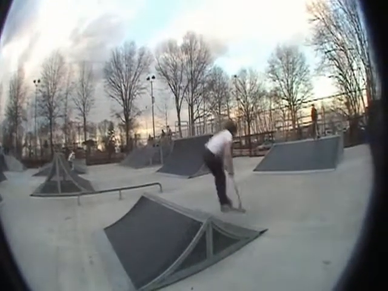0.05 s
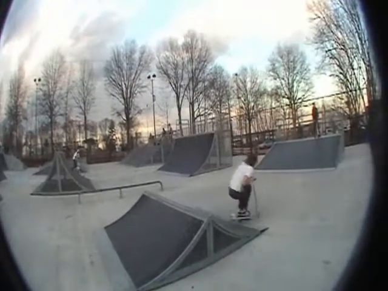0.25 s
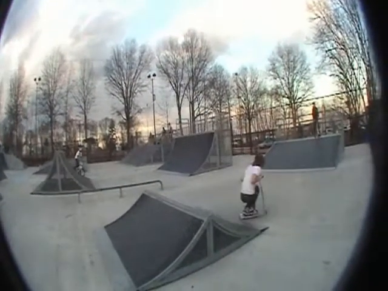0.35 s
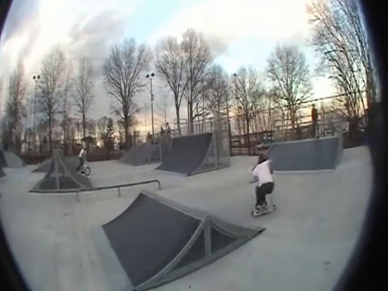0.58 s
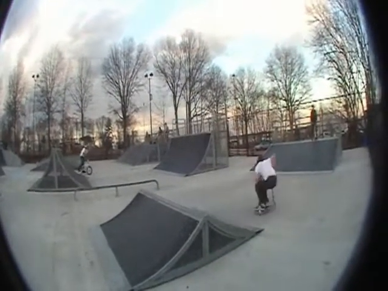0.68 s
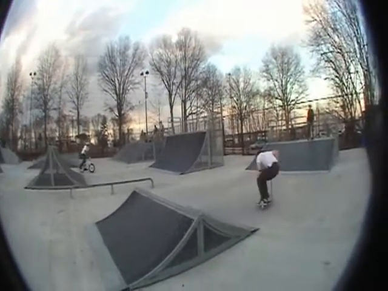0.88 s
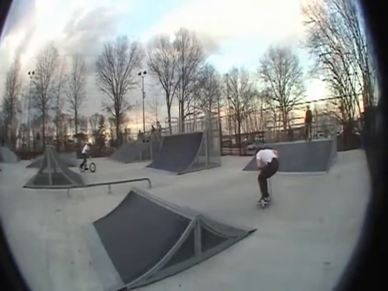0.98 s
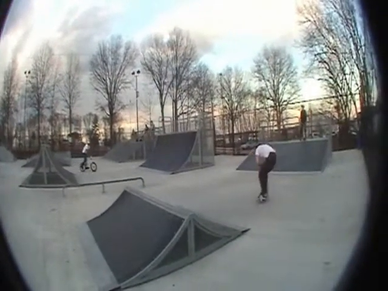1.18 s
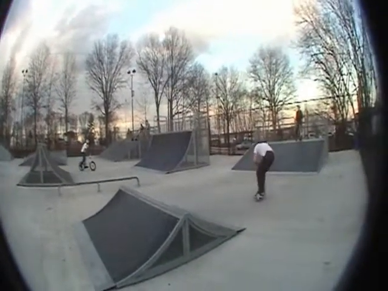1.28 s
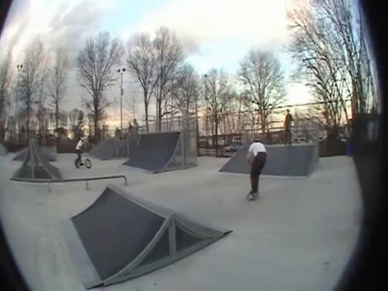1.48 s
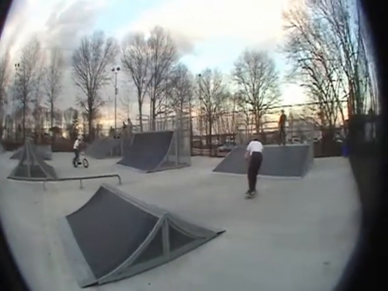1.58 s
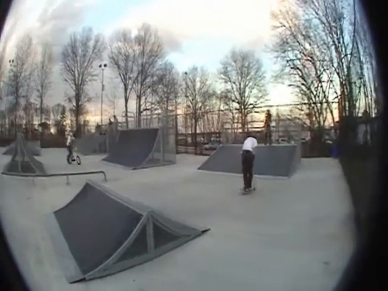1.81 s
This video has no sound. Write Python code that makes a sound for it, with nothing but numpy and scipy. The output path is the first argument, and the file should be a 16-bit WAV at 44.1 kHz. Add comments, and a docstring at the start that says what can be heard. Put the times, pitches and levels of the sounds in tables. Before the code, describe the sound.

A stunt scooter lands close on the right with a hard, ringing clatter at an outdoor skatepark. A lighter clatter and clinks follow, then the wheels rumble softly over concrete joints and scrub briefly, with light wind on the microphone.

```python
"""An outdoor concrete skatepark: a stunt scooter lands hard, close by on the right, and rolls away.
Wheels and deck (the board you stand on) slam down in a quick clatter that rings on in the frame and
among the ramps; a lighter clatter follows. Loose parts clink. The wheels rumble, tick, thud over
joints and scrub sideways in a turn, while a light wind brushes the microphone."""
import sys
import numpy as np
from scipy import signal
from scipy.fft import rfft, irfft
from scipy.io import wavfile

SR = 44100
rng = np.random.default_rng(int(sys.argv[2]) if len(sys.argv) > 2 else 0)


def to_wav(s):
    """Save 16-bit WAV."""
    ch = np.atleast_2d(s).T  # columns
    pcm = np.round(np.clip(ch, -1, 1) * 32767)  # PCM
    wavfile.write(sys.argv[1], SR, pcm.astype(np.int16))


N = 81585


def amp(db):
    """Turns decibels into a number to multiply a sound by."""
    return 10 ** (np.asarray(db) / 20)

def unit(x):
    """Scales a signal to an average power of 1."""
    return x / np.sqrt(np.mean(x ** 2) + 1e-20)

def look_up(table, hz):
    """Reads a table between its rows, on a scale where all octaves are equally wide."""
    pitches, values = np.transpose(table)
    return np.interp(np.log(hz + 1), np.log(pitches + 1), values)

def loudness(table, column):
    """Turns one decibel column of a time table into a volume curve for the whole scene."""
    rows = np.array(table)
    return amp(np.interp(np.arange(N) / SR, rows[:, 0], rows[:, column]))

def add(mix, start_s, sound):
    """Mixes a sound in at its start time."""
    part = mix[:, max(round(start_s * SR), 0):][:, :sound.shape[-1]]
    part += sound[..., :part.shape[-1]]

TREBLE_HZ, BASS_HZ = 3640, 356
def colour(x, tone, treble_db=0, bass_db=0):
    """Sets how strong the pitches are next to each other, then turns treble and bass up or down."""
    size = 4096
    hz = abs(np.fft.fftfreq(size, 1 / SR))
    treble = treble_db * hz ** 2 / (hz ** 2 + TREBLE_HZ ** 2)
    bass = bass_db * BASS_HZ ** 2 / (hz ** 2 + BASS_HZ ** 2)
    gain = unit(amp(look_up(tone, hz))) * amp(treble + bass)
    response = np.exp(np.conj(signal.hilbert(np.log(gain + 1e-6))))  # nothing sounds before its hit
    taps = np.fft.ifft(response).real[:size // 2]
    return signal.fftconvolve(x, taps[None], axes=1)[:, :x.shape[1]]

# How alike left and right sound: pitch_hz, likeness (0 to 1)
LIKENESS = [(50, .985), (200, .995), (650, .975), (1400, .86), (3000, .82), (7000, .62), (11000, .38),
            (16000, .28)]
def stereo(a, b):
    """Blends two signals so that left and right share the bass but differ in the treble."""
    same = look_up(LIKENESS, np.fft.rfftfreq(len(a), 1 / SR))
    left = irfft(same * rfft(a) + np.sqrt(1 - same ** 2) * rfft(b), len(a))
    return np.array([left, a])

def noise(n):
    """An even hiss in stereo, n samples long."""
    return stereo(*rng.standard_normal((2, n)))

def clicks(n, per_s, spread_db):
    """Scattered clicks of uneven size, in stereo."""
    size = amp(spread_db * np.minimum(rng.exponential(1, (2, n)), 4)) * rng.choice([-1, 1], (2, n))
    happens = rng.random((2, n)) < per_s / SR
    return unit(stereo(*(size * happens)))

def ringing(notes, t):
    """Struck metal rings with several pure notes; each drops 60 dB in its ring_s."""
    return np.sqrt(2) * sum(amp(db - 60 * t / ring_s) * np.sin(2 * np.pi * (hz * t + rng.random()))
                            for hz, db, ring_s in notes)

# How loud the rolling is: time_s, rumble_db, hiss_db
ROLL_LEVELS = [(0, -46, -32), (0.03, -41.5, -42), (0.19, -39.5, -45.5), (0.45, -29, -31.5),
               (0.56, -36, -35), (0.67, -40, -35), (0.71, -41, -50.5), (0.80, -37.5, -50),
               (1.05, -38.5, -55.5), (1.28, -42, -52), (1.36, -37, -43.5), (1.40, -34, -45),
               (1.50, -34.5, -44.5), (1.565, -33, -43), (1.635, -37.5, -42.5), (1.70, -36, -46.5),
               (1.85, -35.5, -45)]
# Tone of the low rumble and of the gritty hiss: pitch_hz, level_db
RUMBLE_TONE = [(30, -27), (80, -7), (130, -2), (210, 1), (290, -5), (380, -2.5), (520, -12.5), (680, -9.5),
               (1000, -16), (1350, -17.5), (2000, -23), (4000, -58), (16000, -54)]
HISS_TONE = [(100, -16), (600, -3.5), (1350, -1.5), (2100, -1.5), (3000, -0.5), (4400, -8), (7000, -11),
             (10000, -24.5), (16000, -26.5)]
def rolling():
    """Hard wheels rumble and crush grit, unevenly, as the ground changes."""
    wobbles_per_s, grit_share = 35.2, 0.41
    wobble_times = np.arange(0, 2, 1 / wobbles_per_s)
    wobble_db = np.interp(np.arange(N) / SR, wobble_times, rng.standard_normal(N)[:len(wobble_times)])
    grit = np.sqrt(grit_share) * clicks(N, per_s=900, spread_db=2.5)
    hiss = colour(grit + np.sqrt(1 - grit_share) * noise(N), HISS_TONE)
    rumble = colour(noise(N), RUMBLE_TONE)
    return amp(wobble_db) * (rumble * loudness(ROLL_LEVELS, 1) + hiss * loudness(ROLL_LEVELS, 2))

# Tone of a wheel's thin tick: pitch_hz, level_db
TICK_TONE = [(500, -28), (3000, -17), (7000, 7), (8500, -1), (10800, 1), (12500, -21), (16000, -12)]
def wheel_ticks():
    """A spinning wheel ticks faintly once every turn."""
    turns_per_s, fade_s = 32, 0.0024
    turn, part_turn = np.divmod(np.arange(N) / SR * turns_per_s, 1)
    size = amp(-51.5 - 0.2 * rng.standard_normal(N))[turn.astype(int)]
    return colour(noise(N) * size * np.exp(-part_turn / turns_per_s / fade_s), TICK_TONE)

# How strong the wind is: time_s, level_db
GUST_LEVELS = [(0, -48), (0.72, -82), (0.82, -33), (1.0, -52), (1.3, -46.5), (1.5, -57), (1.6, -33),
               (1.72, -40.5), (1.85, -37.5)]
# Tone of the wind and of the park's background: pitch_hz, level_db
WIND_TONE = [(10, -51), (28, -9), (50, -1), (90, -2), (200, -11.5), (1000, -48), (16000, -84)]
PARK_TONE = [(20, -31), (45, -1), (150, -4.5), (500, -7), (1300, -7.5), (2200, -18.5), (3200, -26),
             (4400, -22.5), (6500, -19.5), (8500, -32), (16000, -37)]
def air():
    """Low gusts hit each side of the microphone a little differently, over the park's steady hush."""
    gusts = noise(N) + 0.24 * rng.standard_normal((2, N))
    wind = colour(gusts, WIND_TONE) * loudness(GUST_LEVELS, 1)
    return wind + amp(-48) * colour(noise(N), PARK_TONE)

# Each clink of a loose part: start_s, level_db, treble_db, ring_db, ping_db
CLINK_HITS = [(0.057, -43, 11, -20, -13), (0.141, -23, -18.5, -15, -39), (0.5047, -33, 10, -20, -5),
              (0.5711, -33.5, 13, -20, -3.5), (0.609, -36, 9, -22, -6), (0.6734, -43, 0, -9, -20),
              (0.9867, -30, -4, -8, -22), (1.0109, -37, 0, -6, -22)]
# Tone of its tick: pitch_hz, level_db
CLINK_TONE = [(200, -2), (1200, -1.5), (2150, 3), (3100, 1.5), (4600, -9.5), (7600, -6.5), (9300, -18),
              (11000, -23), (16000, -24)]
# Notes of the larger parts and of the smallest: pitch_hz, level_db, ring_s
CLINK_NOTES = [(2050, -1, 0.024), (2770, -1, 0.054), (3310, -6, 0.07)]
PING_NOTES = [(7530, 6, .024), (9140, -0.5, 0.037)]
def clinks():
    """Loose metal parts tick: the larger ones ring briefly, the smallest ping."""
    out, t = np.zeros((2, N)), np.arange(SR // 5) / SR
    tick_s, tail_s = 0.0021, 0.036
    for start_s, level_db, treble_db, ring_db, ping_db in CLINK_HITS:
        tick = noise(len(t)) * (np.exp(-t / tick_s) + amp(-16) * np.exp(-t / tail_s))
        tuning = 1 + 0.0067 * rng.uniform(-0.8, 1)  # no two parts ring quite alike
        ring = amp(ring_db) * ringing(CLINK_NOTES, t * tuning)
        ping = amp(ping_db) * ringing(PING_NOTES, t * tuning)
        add(out, start_s, amp(level_db) * (colour(tick, CLINK_TONE, treble_db) + ring + ping))
    return out

# Each blow on the concrete: start_s, level_db, treble_db, bass_db, ring_db, crack_s
LANDING_BLOWS = [(0.2116, -7.5, -1, 1.5, -6, 0.0016), (0.2134, -9, 10.5, -1, -5, 0.0023),
                 (0.2331, -12, 2.5, 2, -3, 0.004), (0.2385, -12, 2.5, -6, -1, 0.0053),
                 (0.2428, -14.5, 9.5, -12.5, -0.5, 0.0015), (0.2525, -18, -2, -9.5, 2.5, .003),
                 (0.2586, -17.5, -12, 0.5, -3.5, 0.0012), (0.2757, -16.5, -1, -6, 0.5, 0.0034),
                 (0.2990, -7.5, -1, -14.5, -3.5, 0.0048), (0.3035, -9.5, -9, -13.5, 1, 0.0033),
                 (0.3222, -21, -8, -2, 1.5, .003), (0.330, -14.5, -3, -20, -9, .004),
                 (0.4880, -10, 4.5, -6, -12, 0.00086), (0.4915, -17.5, 3, 2, -8, 0.0016),
                 (0.4950, -19.5, 5, 1.5, -6.5, .0015), (0.4980, -13, -7.5, 4.5, -6, 0.0034),
                 (0.5095, -23, -2, 7, -0.5, 0.0048), (0.5383, -26, -4, 0, -7.5, .001),
                 (0.6550, -26.5, -9, -23, -1.5, 0.0033)]
# Tone of the crack: pitch_hz, level_db
CRACK_TONE = [(30, -24), (90, 0.5), (220, 0.5), (380, 4.5), (520, -3), (750, -3), (1200, -1.5), (1600, -5),
              (2900, -5.5), (4200, -10), (5300, -23.5), (7000, -13.5), (10000, -30), (16000, -31)]
# Notes of the deck, cut short by the rider's feet: pitch_hz, level_db, ring_s
DECK_NOTES = [(718, -4, 0.023), (1270, -5, 0.04), (2100, -12, 0.0093), (2885, -4, 0.02),
              (3150, -3.5, 0.021)]
def landing():
    """Each blow cracks, clangs the hollow deck, shakes loose parts and rings on."""
    out, t = np.zeros((2, N)), np.arange(SR) / SR
    attack_s, ring_rise_s, rattle_fade_s = 0.000088, 0.0021, 0.049
    attack, ring_rise = 1 - np.exp(-t / attack_s), 1 - np.exp(-t / ring_rise_s)
    for start_s, level_db, treble_db, bass_db, ring_db, crack_s in LANDING_BLOWS:
        crack = noise(SR) * np.exp(-t / crack_s) * attack
        clang = amp(-10.5) * ringing(DECK_NOTES, t) * attack
        rattle = clicks(SR, per_s=220, spread_db=3) * amp(ring_db - 12) * np.exp(-t / rattle_fade_s)
        ring = (ramp_echo(treble_db, bass_db) + frame_ring(t, bass_db)) * ring_rise
        clatter = colour(crack + rattle, CRACK_TONE, treble_db, bass_db)
        add(out, start_s, amp(level_db) * (clatter + clang + amp(ring_db) * ring))
    return out + deck_boom(out)

# Tone of the echo after a blow: pitch_hz, level_db
ECHO_TONE = [(30, -35), (75, -17), (160, -2), (270, -3), (390, -3), (520, -17), (700, -1.5), (1000, -4.5),
             (1220, 1), (1550, -8), (2200, -3.5), (3100, -4), (4200, -15.5), (5300, -21.5), (7300, -22),
             (10000, -34.5), (16000, -39)]
# How long the echo takes to drop 60 dB: pitch_hz, ring_s
ECHO_TIMES = [(100, 1.75), (300, 1.23), (700, 0.75), (1400, 0.49), (3000, 0.35), (8000, 0.4), (16000, 0.48)]
def ramp_echo(treble_db, bass_db):
    """A blow lingers among the ramps as a wash of noise whose low pitches last longest."""
    hz, t, bands = signal.stft(noise(SR), SR, nperseg=256)
    fade = amp(-60 * t / look_up(ECHO_TIMES, hz)[:, None])
    echo = signal.istft(bands * fade, SR, nperseg=256)[1][:, :SR]
    return amp(-6.5) * colour(echo, ECHO_TONE, treble_db / 2, bass_db)

# Notes of the deck, handlebar and fork: pitch_hz, level_db, ring_s
FRAME_NOTES = [(167, -9, 0.9), (232.8, -4.5, 1.12), (318.8, -2, 1.03), (383.4, 0, 0.44),
               (657.4, -4.5, 0.38), (670, -2, 0.69), (766, -9, 0.95), (878, -8, 1.05), (930, -3.5, 0.39),
               (1053, -5, 0.79), (1150, -1, 0.6), (1238, -9, 0.44), (1317, -3.5, 0.62), (1392, -17, 0.6),
               (2810, -6, 0.74), (3130, -10.5, 0.92)]
def frame_ring(t, bass_db):
    """The frame rings, and its pitch wavers as it shakes under the rider."""
    wavers_per_s, waver_share = 70.2, 0.0074
    notes = [(hz, db + bass_db * (hz < BASS_HZ) / 2, ring_s) for hz, db, ring_s in FRAME_NOTES]
    drift = np.interp(t * wavers_per_s, np.arange(256), rng.standard_normal(256))
    uneven_time = t + waver_share * np.cumsum(drift) / SR
    return amp(-21) * ringing(notes, uneven_time)

def deck_boom(blows, pitch_hz=237, width_hz=26):
    """The deck's hollow body booms along with the blows."""
    return signal.lfilter(*signal.iirpeak(pitch_hz, pitch_hz / width_hz, SR), blows)

# Each bump over a joint in the concrete: start_s, level_db, knock_db
JOINT_BUMPS = [(0.5100, -13, -18), (0.5389, -24, -28), (0.6240, -20, -31), (0.6920, -21.5, -30),
               (0.8035, -25.5, 1.5), (0.8885, -30, 8.5), (0.899, -26.5, -28), (1.5600, -24, -4.5),
               (1.583, -22.5, -9), (1.639, -20.5, -31), (1.6600, -23.5, -22)]
# Tone of the dull thud and of the hollow knock: pitch_hz, level_db
THUD_TONE = [(30, -27), (70, -17.5), (120, 1.5), (220, 4), (370, -2), (520, -17), (850, -18), (1300, -35.5),
             (3000, -34), (16000, -68)]
KNOCK_TONE = [(100, -30), (380, 7), (520, 4), (880, 1), (1250, -24), (3000, -25), (16000, -69)]
def thuds():
    """A wheel drops over a joint: one push makes a thud and a knock, each with a short noisy tail."""
    out, t = np.zeros((2, N)), np.arange(SR // 3) / SR
    thud_tail_s, knock_tail_s = 0.032, 0.026
    push = (t == 0) * np.sqrt(0.001 * SR)  # a single sharp spike
    for start_s, level_db, knock_db in JOINT_BUMPS:
        thud = colour(push + noise(len(t)) * amp(-8) * np.exp(-t / thud_tail_s), THUD_TONE)
        knock = colour(push + noise(len(t)) * amp(-8) * np.exp(-t / knock_tail_s), KNOCK_TONE)
        add(out, start_s, amp(level_db) * (thud + amp(knock_db) * knock))
    return out

# Each sideways scrub as the rider turns: start_s, fade_s, level_db, squeal_hz
TURN_SCRUBS = [(1.367, 0.056, -31, 2710), (1.534, 0.057, -32, 2480), (1.612, 0.023, -35, 3300)]
# Tone of the scraping: pitch_hz, level_db
SCRUB_TONE = [(200, -1), (700, 0), (1750, 11), (2900, 1.5), (4200, -4), (5500, -21), (16000, -63)]
def scrubs():
    """A wheel slips on the concrete in many tiny jerks, which scrape and set off a rough squeal."""
    out, t = np.zeros((2, N)), np.arange(SR // 4) / SR
    rise_s, width_hz = 0.007, 150
    for start_s, fade_s, level_db, squeal_hz in TURN_SCRUBS:
        slips = clicks(len(t), per_s=4000, spread_db=2.9)
        squeal = unit(signal.lfilter(*signal.iirpeak(squeal_hz, squeal_hz / width_hz, SR), slips))
        swell = (1 - np.exp(-t / rise_s)) * np.exp(-t / fade_s)
        add(out, start_s, amp(level_db) * swell * (colour(slips, SCRUB_TONE) + amp(-4.5) * squeal))
    return out

# How much louder the left side is than the right: pitch_hz, left_minus_right_db
SIDE_BALANCE = [(60, -3), (200, 0), (700, 1), (1290, 2.5), (2380, -5), (4400, -9), (8100, -9.5),
                (15000, -5.5)]
def place(x, left_treble_db=0):
    """Treble from the right reaches that side sooner and louder; in the bass the left leads a little."""
    left_lead_rad, right_lead_s, changeover_hz = 0.17, 0.0001, 910
    hz = np.fft.rfftfreq(2 * N, 1 / SR)
    tilt_db = look_up(SIDE_BALANCE, hz) + left_treble_db * hz / (hz + 1000)
    delay_s = right_lead_s * hz ** 2 / (hz ** 2 + changeover_hz ** 2)
    left_shift = np.exp(1j * left_lead_rad - 2j * np.pi * hz * delay_s)
    sides = np.array([amp(tilt_db / 2) * left_shift, amp(-tilt_db / 2)])
    return irfft(rfft(x, 2 * N) * sides)[:, :N]

def scene():
    """The landing is close and to the right; the rolling lies nearer the middle."""
    right = place(landing() + clinks())
    middle = place(rolling() + wheel_ticks() + scrubs() + thuds() + air(), left_treble_db=4.5)
    return right + middle

def record(dry):
    """The loudest peaks overload and are rounded off; then the very highest treble is cut."""
    rounded = dry / (1 + dry ** 6) ** (1 / 6)
    treble_cut = signal.firwin(255, cutoff=15900, window=("kaiser", 9), fs=SR)
    return signal.oaconvolve(rounded, treble_cut[None], "same")

dry = scene()
out = record(dry)
to_wav(out)
```